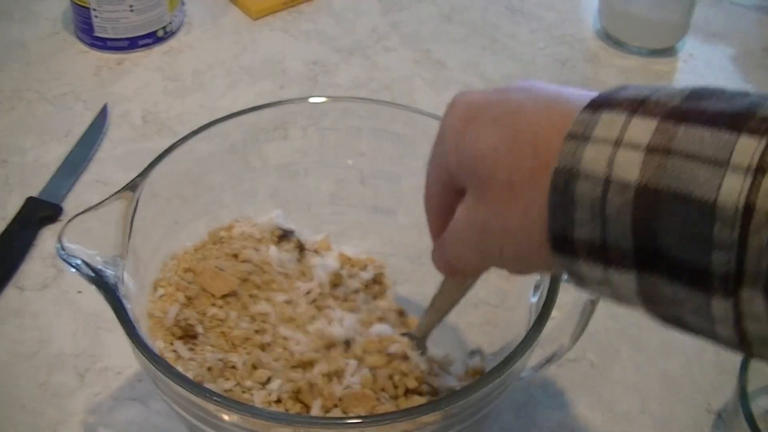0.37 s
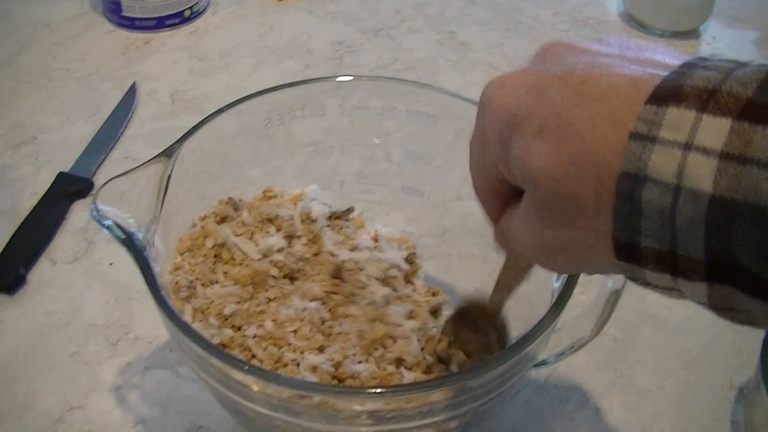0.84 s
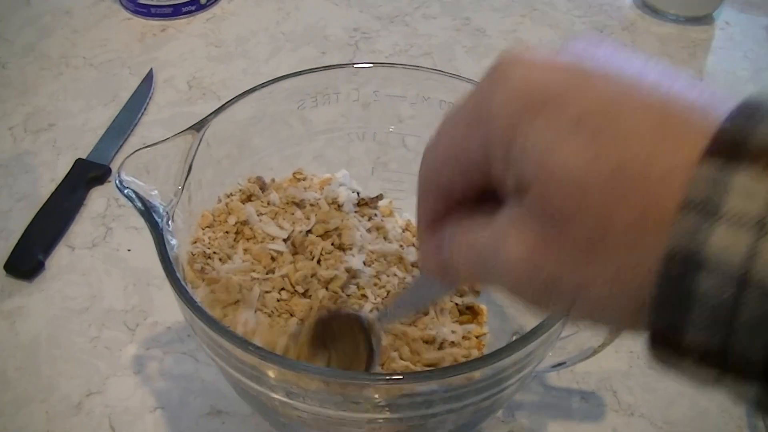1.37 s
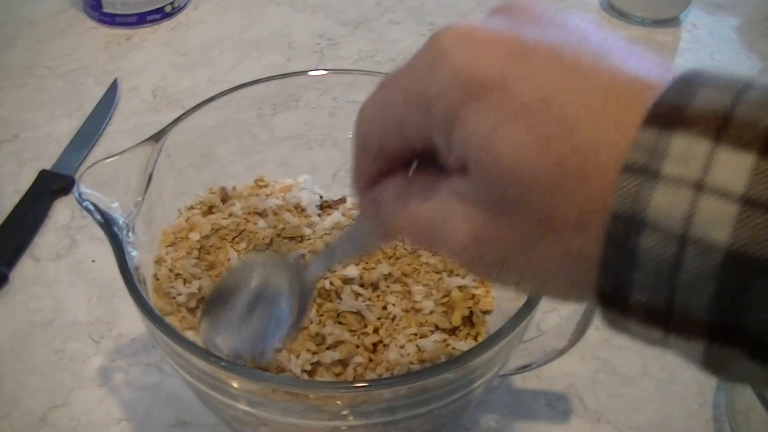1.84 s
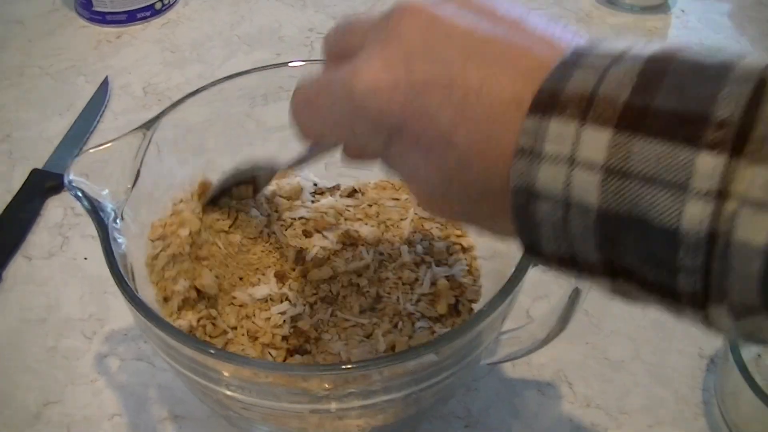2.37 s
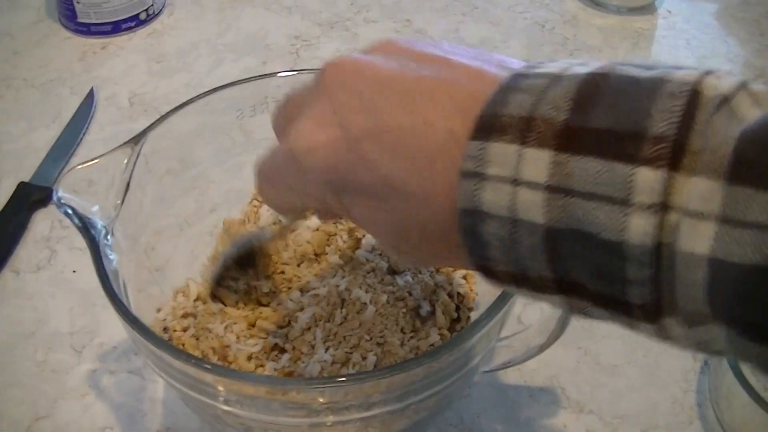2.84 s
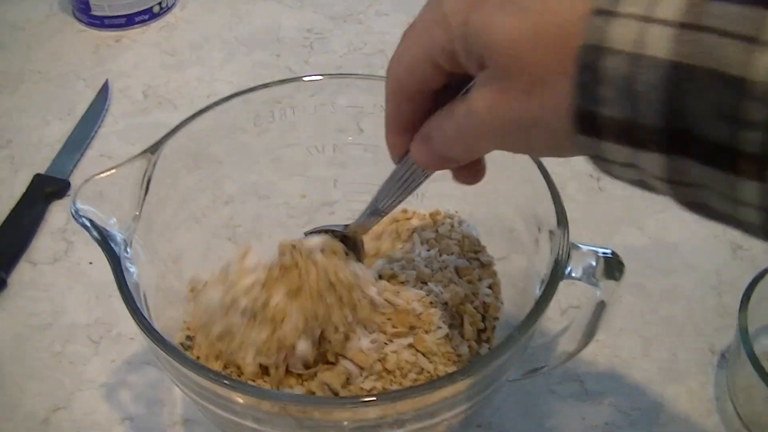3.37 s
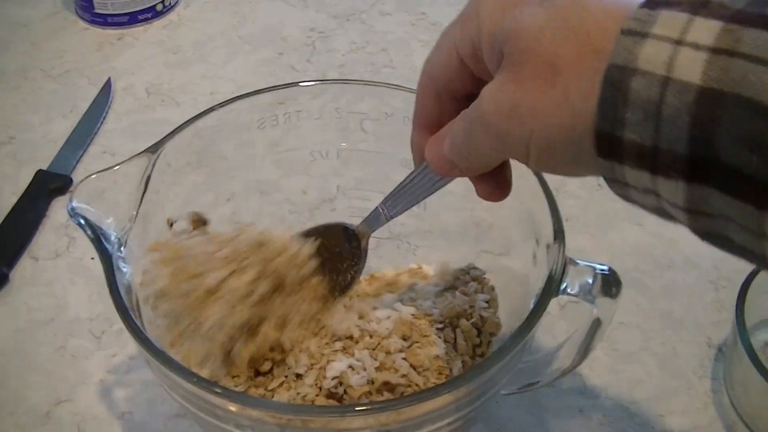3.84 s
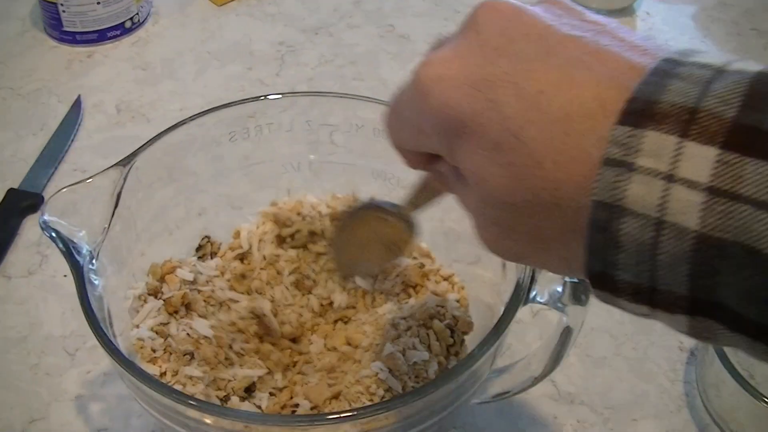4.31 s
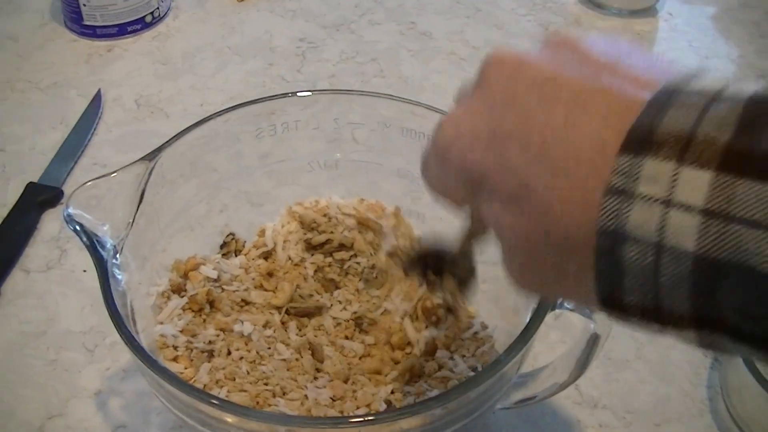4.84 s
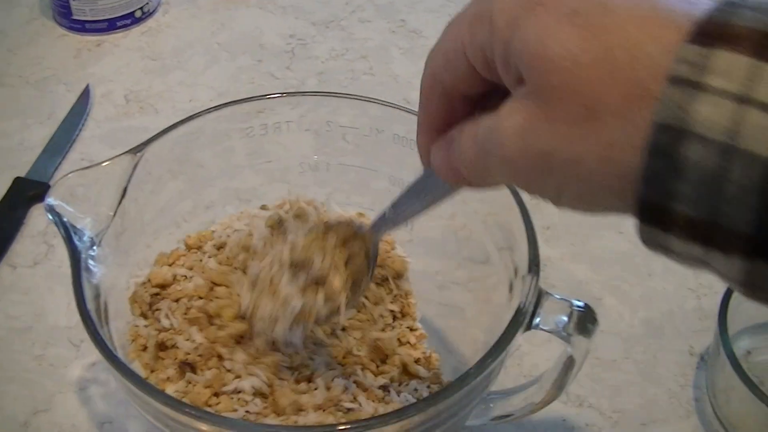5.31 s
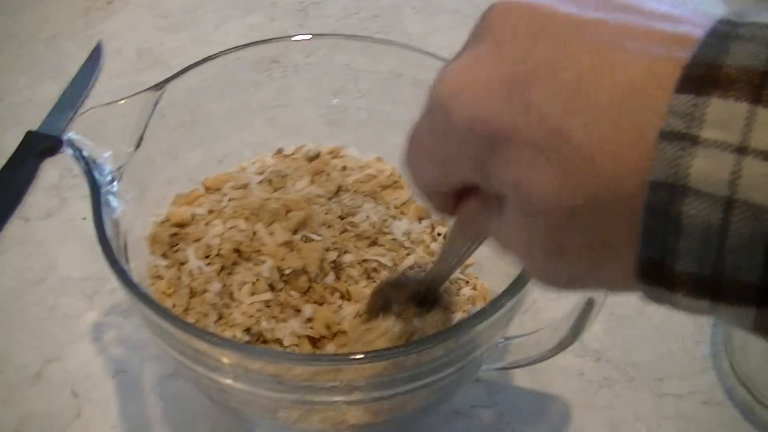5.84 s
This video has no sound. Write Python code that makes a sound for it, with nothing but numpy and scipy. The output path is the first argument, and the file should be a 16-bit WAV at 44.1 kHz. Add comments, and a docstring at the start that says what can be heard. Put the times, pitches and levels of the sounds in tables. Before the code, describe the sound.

A metal spoon briskly stirs a dry crumbly mixture in a thick glass bowl, with bright clinks, gritty rustling and knocks on the counter.

```python
"""Stirring crumbs in a glass bowl

A steel spoon stirs a dry crumbly mixture in a thick glass bowl on a kitchen counter: clicks ring glass and steel modes.
Random snaps and a coarse drag make the crumbs; the bowl rocks and its foot knocks short counter modes.
Dull thumps ring two low resonances of the house, under filtered-noise room air and a noise echo tail.
A small microphone with a limiter listens from close by."""
import sys
import numpy as np
from scipy import signal
from scipy.fft import rfft, irfft, next_fast_len
from scipy.io import wavfile

SR = 44100
rng = np.random.default_rng(int(sys.argv[2]) if len(sys.argv) > 2 else 0)


def ratio_of_db(decibels):
    """Turn decibels (scalar or array-like) into linear amplitude factors; 0 dB maps to 1."""
    return 10 ** (np.asarray(decibels, float) / 20)


def transcribe(signal):
    """Save signal, clipped to [-1, 1], as a 16-bit WAV file at the path in sys.argv[1]."""
    frames = np.atleast_2d(signal).T
    limited = np.clip(frames, -1, 1)
    pcm = np.round(limited * 32767).astype(np.int16)
    wavfile.write(sys.argv[1], SR, pcm)


N = 262593   # samples


def rms_one(x):
    """Scales a signal to rms 1."""
    return x / np.sqrt(np.mean(x ** 2) + 1e-20)


def at_hz(points, hz):
    """Reads a (Hz, dB) curve along a log-frequency axis."""
    curve_hz, curve_db = np.transpose(points)
    return np.interp(np.log(hz), np.log(curve_hz), curve_db)


def ring(clicks, hz, t60):
    """A damped resonance: a unit click sets a sine of height 1 ringing."""
    r, w = ratio_of_db(-60 / (t60 * SR)), 2 * np.pi * hz / SR
    return signal.lfilter([0, np.sin(w)], [1, -2 * r * np.cos(w), r * r], clicks + 1e-18)


def clicks_at(times, db):
    """One single-sample click for each time."""
    out = np.zeros(N)
    np.add.at(out, np.minimum((np.asarray(times) * SR).astype(int), N - 1), ratio_of_db(db))
    return out


def dying(times, db, t60):
    """A level that jumps at each time and dies away exponentially."""
    return signal.lfilter([1], [1, -ratio_of_db(-60 / (t60 * SR))], clicks_at(times, db) + 1e-18)


def coloured(x, spectrum):
    """Lays a spectrum on a noisy signal; rms 1."""
    size = next_fast_len(N)
    hz = np.maximum(np.arange(size // 2 + 1) * SR / size, 1)
    shaped = rfft(x, size) * ratio_of_db(at_hz(spectrum, hz))
    return rms_one(irfft(shaped, size)[..., :N])


def grains(per_s, spread_db):
    """Random clicks of either sign, most small and a few large; rms 1."""
    sizes = ratio_of_db(spread_db * np.minimum(rng.exponential(1, N), 5)) * rng.choice([-1, 1], N)
    return rms_one(sizes * (rng.random(N) < per_s / SR))


# tone of the room air: pitch_hz, relative density_db [dB per Hz]
AIR_TONE = [(18, -42), (30, -3.5), (294, 2), (566, -2.5), (1490, -6.5), (1660, -10), (2590, -8.5),
            (4730, -11), (7200, -10.5), (11200, -11), (15800, -23)]


def room_air():
    """Steady room tone: two independent noises, for middle and side."""
    return ratio_of_db(-50.5) * coloured(rng.standard_normal((2, N)), AIR_TONE)


# two low resonances of the house: pitch_hz, width_hz
HOUSE_MODES = [(69, 7.4), (131, 22)]
# steady rumble, one level_db for each house mode
STEADY_RUMBLE = (-86, -66)
# dull thumps in the house: start_s, low_mode_db, high_mode_db [peak]
THUMPS = [(0.03, -52, -34), (0.73, -48, -46), (0.959, -46, -44), (1.534, -40.5, -40), (1.83, -40, -40.5),
          (2.07, -45, -46), (2.262, -43.5, -46), (2.409, -46, -47), (5.021, -57, -56), (5.321, -62, -35),
          (5.772, -66, -49)]


def house_rumble():
    """Thumps and faint noise pass twice through each low house resonance, which softens their onset."""
    s, *thump_db = np.transpose(THUMPS)
    out = np.zeros(N)
    for (hz, width), db, steady_db in zip(HOUSE_MODES, thump_db, STEADY_RUMBLE):
        t60 = np.log(1000) / (np.pi * width)
        noise = rng.standard_normal(N + SR)
        steady = ring(ring(noise, hz, t60), hz, t60)[SR:]   # the first second is build-up
        out += ratio_of_db(steady_db) * rms_one(steady)
        thumps = ring(ring(clicks_at(s, db), hz, t60), hz, t60)
        out += thumps * 2 * np.e * np.pi * width / SR   # peak as in the table
    return out


# echo tail of the kitchen by band: pitch_hz, t60_s
KITCHEN = [(150, 0.45), (300, 0.32), (700, 0.41), (1800, 0.39), (4800, 0.28), (10000, 0.15)]


def kitchen_echo(x):
    """Echo tail: noise that dies band by band, one draw for the middle and one for the side."""
    t, tail = np.arange(SR // 2) / SR, 0
    for hz, t60 in KITCHEN:
        band = signal.butter(2, [hz / 1.5, hz * 1.5], "band", fs=SR, output="sos")
        noise = signal.sosfilt(band, rng.standard_normal((2, len(t))))
        tail = tail + noise * ratio_of_db(-60 * t / t60)
    tail = tail * np.clip(t / 0.0084, 0, 1) / np.sqrt(np.sum(tail ** 2) / 2)   # 8.4 ms fade-in
    return signal.fftconvolve(x[None], tail, axes=1)[:, :N]


# knocks on the counter, mostly by the bowl foot: start_s, relative level_db, dullness [dB per octave below 1
# kHz]
KNOCKS = [(0.008, -51.5, 18.5), (0.031, -41.5, 13), (0.057, -51, 16), (0.439, -13.5, -2),
          (0.729, -57, 19.5), (0.81, -48.5, 14), (0.998, -17, 4.5), (1.014, -22.5, -0.5), (1.282, -62, 18),
          (1.426, -18, 0), (1.726, -6.5, -0.5), (2.22, -9, 1.5), (2.524, 0.5, -2.5), (2.878, -21.5, -19),
          (2.943, 2, 0.5), (3.141, -22.5, 5), (3.26, -1, -2.5), (3.308, -5, -1), (3.338, -11.5, 1.5),
          (3.518, -22, -20), (3.674, -1.5, -3), (4.062, -32, 5.5), (4.288, -55, 12), (4.484, -18, -1.5),
          (4.884, -40, -15), (4.938, -17, 4.5), (4.945, -11, 2.5), (5.16, -40, 9.5), (5.332, -14, 2),
          (5.47, -17.5, 3.5), (5.765, -17, -8), (5.775, -3, -0.5), (5.931, -30, 5.5)]
# modes of the counter top: pitch_hz, relative level_db, t60_s
COUNTER_MODES = [(201.5, 6.5, 0.044), (237, 9, 0.016), (304.8, -4.5, 0.3), (421, 2, 0.035),
                 (467.3, -0.5, 0.072), (586, -2.5, 0.063), (712, -5, 0.024), (892, -2, 0.048),
                 (910.3, -6, 0.066), (1035, -2, 0.018), (1133, -3, 0.032), (1191, -2, 0.016),
                 (1495, 0.5, 0.013), (1710, 2.5, 0.0095), (2145, -7, 0.032), (2397, 0, 0.014),
                 (3280, -2.5, 0.01), (4100, -7, 0.011), (4900, -35, .004)]
# the foot bounces after each knock: delay_s, relative level_db
REBOUNDS = [(.0074, 0), (.0115, -5.5), (.015, -5), (.026, -10)]
# tone of a plain knock: pitch_hz, relative level_db
KNOCK_TONE = [(220, -25.5), (500, -9), (1000, -0.5), (2500, -15.5)]


def counter_knocks():
    """Each knock and its rebounds ring the short, dull modes of the counter top."""
    s, knock_db, dull_db = np.transpose(KNOCKS)
    out = np.zeros(N)
    chance = rng.standard_normal((len(s), len(COUNTER_MODES), len(REBOUNDS) + 1))
    for k, (hz, db, t60) in enumerate(COUNTER_MODES):
        tone_db = knock_db + at_hz(KNOCK_TONE, hz) + dull_db * np.log2(1000 / min(hz, 1000))
        tone_db += 0.21 * knock_db * np.log2(max(hz, 1000) / 1000)   # harder knocks are brighter
        blows = clicks_at(s, tone_db + 2.5 * chance[:, k, 0])
        for j, (lag, rebound_db) in enumerate(REBOUNDS):
            blows += clicks_at(s + lag, tone_db + rebound_db + 3 * chance[:, k, j + 1])
        out += ratio_of_db(db) * ring(blows, hz, t60) * (-1) ** k
    too_small_for_bass = signal.butter(3, 140, "high", fs=SR, output="sos")
    return signal.sosfilt(too_small_for_bass, out)


# spoon on glass: start_s, relative spoon_db, relative glass_db, hardness [dB per octave],
# place round the bowl [dB], place up the wall [dB]
CLINKS = [(0.0882, -35, -52, 12, -1, -1), (0.2322, 0, -7.5, 6.5, 1.5, 12), (0.5356, -49, -46.5, 1, -9, 6),
          (0.616, -42, -42.5, 2, -9, 7), (0.8155, -21, -47.5, 13.5, -7, 2), (0.863, -14.5, -53, 18, 2, -3),
          (1.397, -31, -48.5, 20.5, -1, 1), (1.4256, -16, -43, 1, 12, -2), (1.6235, -35, -44, 12, -5, -9),
          (1.9247, 1.5, -22.5, -2, -15.5, 23), (1.941, -49, -41.5, -10.5, 2.5, -13),
          (2.373, -17, -48, 3.5, 0, -10), (2.4241, -27, -44.5, 10, 5, 5), (2.436, -52, -47, -0.5, 8.5, -8),
          (2.6833, -39, -42, 1.5, -2.5, -2), (2.833, -24.5, -47.5, -1, 9.5, 10),
          (3.1408, -4.5, -29.5, -1.5, 14, 6), (3.516, -2.5, -52, -4.5, 20.5, 9),
          (3.5911, 1, -9.5, 7, -10, -2), (3.8348, -45, -39, 1.5, -8, -5), (3.867, -11.5, -31.5, 1, 1, 8),
          (4.0559, -34, -34.5, 4, 1, 6.5), (4.2394, -19, -35, 8, 1.5, 1.5), (4.3837, -19, -64, 19, 16, -7),
          (4.445, -15, -37, 4, -2, 6), (4.455, -2.5, -27, -5.5, 1, -3), (4.665, -25, -41, 3.5, -6, 3),
          (4.826, -24, -57, 18, -7, 8), (4.853, -21, -53.5, 23, 1, 2), (4.8832, -11.5, -47, 0, 2, 30.5),
          (5.105, -22, -48, 3, -3, 9), (5.2792, -39, -50, 14, 6, 7), (5.461, -30, -32, 0.5, 0, 4),
          (5.469, -18, -50.5, 8, 26, 4), (5.5774, -14, -53.5, -2.5, 9, 11), (5.6883, -23.5, -57, 14, -6, 3),
          (5.894, -16, -39, 7, -6, 2)]
# strokes through the crumbs: start_s, length_s, relative start_db, relative end_db,
# ringing_db [share that rings the glass, held until the next stroke]
STROKES = [(0.0, 0.16, -30.5, -46, -2), (0.3, 0.47, -34, -42, 3.5), (0.775, 0.033, -33, -56, 8.5),
           (0.87, 0.21, -34, -35.5, -4), (1.112, 0.2, -44, -40.5, -14), (1.403, 0.28, -30, -32.5, -2.5),
           (1.97, 0.13, -52, -32, -16), (2.378, 0.26, -35, -36.5, -16), (2.815, 0.11, -38.5, -31, 8),
           (3.165, 0.27, -27.5, -40.5, 8), (3.519, 0.24, -31, -26, 2), (4.001, 0.19, -33.5, -31.5, -2),
           (4.399, 0.21, -33, -34.5, -25), (4.832, 0.071, -52, -22.5, -5), (4.99, 0.33, -37, -44, -14),
           (5.264, 0.077, -49, -38, 10.5), (5.446, 0.29, -31.5, -39, -20), (5.756, 0.28, -32, -26, -4)]


def stirring():
    """Crumb, drag and ringing levels in dB; each touch of the spoon starts a short skid through the crumbs."""
    t, strokes, ringing_db = np.arange(N) / SR, 1e-5, np.zeros(N)
    dig_s, settle_db_per_s = 0.012, 179   # the spoon digs in at once, crumbs settle after
    for s, length, start_db, end_db, share_db in STROKES:
        db = np.interp(t, [s, s + length], [start_db, end_db])
        db = db - settle_db_per_s * np.maximum(t - s - length, 0)
        strokes = strokes + ratio_of_db(db) * np.clip((t - s) / dig_s, 0, 1)
        ringing_db[t >= s] = share_db
    s, spoon_db = np.transpose(CLINKS)[:2]
    skid = dying(s, np.minimum(spoon_db, -8.0) - 19, t60=0.25)
    s, knock_db = np.transpose(KNOCKS)[:2]
    shudder = dying(s, knock_db - 22, t60=0.48)   # the bowl drags on a little after a knock
    drag = ratio_of_db(-9.5) * strokes + shudder
    return 20 * np.log10(strokes + skid), 20 * np.log10(drag), ringing_db


# tone of the snapping crumbs: pitch_hz, relative density_db [dB per Hz]
CRUMB_TONE = [(590, -33), (1000, -24), (2350, -8), (3820, -5), (5040, -3.5), (6570, -7), (6970, -13.5),
              (9300, -6.5), (15800, -21.5)]
# tone laid on the drag clicks: pitch_hz, relative level_db
DRAG_TONE = [(70, -34), (130, -13), (250, -2.5), (450, -2.5), (1000, 3), (1800, -3), (3000, -30)]


def crumbs(crumbs_db, drag_db):
    """Crumbs snap in clumps, each snap at one of 12 pitches; the drag over the bottom is coarser and lower."""
    r = np.exp(-2 * np.pi * 12.4 / SR)
    slow_noise = signal.lfilter([1], [1, -2 * r, r * r], rng.standard_normal(N + SR))[SR:]
    clumps = ratio_of_db(3.66 * rms_one(slow_noise))
    snaps, dealt = grains(per_s=9000, spread_db=3.5), rng.integers(0, 12, N)
    lean = ratio_of_db(0.4 * np.array([[1], [-1]]))   # crumbs lie left and right of the spoon
    rustle = 0
    for k, hz in enumerate(np.geomspace(1200, 15000, 12)):
        pitched = rms_one(ring(snaps * (dealt == k), hz, 12 / hz))
        rustle = rustle + pitched * np.sqrt(hz) * lean ** (-1) ** k
    snapping = rms_one(clumps * coloured(rustle, CRUMB_TONE))
    drag = coloured(grains(per_s=1000, spread_db=5.5), DRAG_TONE)
    return ratio_of_db(crumbs_db - 7.5) * snapping + ratio_of_db(drag_db - 7.5) * drag


def contact_crack():
    """The bare contact: a tick of a few ms, then the many weak modes of the thick wall as a dying hiss."""
    s, spoon_db = np.transpose(CLINKS)[:2]
    t = np.arange(SR // 4) / SR
    fade = np.exp(-t / 0.0054) + ratio_of_db(-47.0) * np.exp(-t / 0.016)
    tick = rng.standard_normal(len(t)) * fade
    # both grow faster than the blow, so light touches only ring
    crack = signal.fftconvolve(clicks_at(s, 1.74 * spoon_db - 3.5), tick)[:N]
    return signal.sosfilt(signal.butter(2, [1200, 9000], "band", fs=SR, output="sos"), crack)


# spoon modes, damped by the hand: pitch_hz, relative level_db, t60_s [held to 0.06 at most]
SPOON_MODES = [(4250, -7, 0.055), (5074, -0.5, 0.031), (6110, -34.5, 0.11), (6450, -5, 0.051),
               (8660, -27, 0.099), (9200, -50, .03), (10300, -30, 0.018), (10980, -9, 0.05),
               (14000, -24, 0.022), (16000, -15, 0.021)]


def steel_spoon(crumbs_db):
    """Clinks and rubbing crumbs ring the short steel modes, each a little to one side."""
    s, spoon_db = np.transpose(CLINKS)[:2]
    out, chance = np.zeros((2, N)), rng.standard_normal((len(s), len(SPOON_MODES)))
    rub = grains(per_s=280, spread_db=5.5) * ratio_of_db(crumbs_db - 33)
    for k, (hz, db, t60) in enumerate(SPOON_MODES):
        blows = clicks_at(s, spoon_db - 14 + 3 * chance[:, k])
        lean = ratio_of_db(1.13 * (-1) ** k * np.array([[1], [-1]]))
        out += lean * ratio_of_db(db) * ring(blows + np.roll(rub, 31 * k), hz, min(t60, .06))
    return out


# glass modes, some in close twins: pitch_hz
GLASS_PITCHES = [585, 641, 1475, 1535, 2630, 2680, 3634, 4190, 4315, 4700, 5748, 5880, 6164, 6246, 6590,
                 6756, 7388, 7575, 7805, 7910, 8664, 9582, 9760, 12090, 12500, 14700]
# one row a glass mode: relative level_db, t60_s, response to place round, response to place up [both held to -1..1]
GLASS_MODES = [(-15, 0.23, 0.56, 0.31), (-20, 0.37, 1, 0.46), (-13, 0.52, 0.78, 0.61),
               (2, 0.38, -0.37, -0.36), (-5, 0.3, 1, -1.1), (0.7, 0.27, -0.18, -0.075),
               (-6, 0.19, .99, 0.035), (-9.5, 0.091, -1.3, 0.39), (-40, .067, .99, .99),
               (-4, 0.2, -0.58, 0.5), (-22, 0.36, -0.042, -0.22), (-20, 0.18, -.99, -1.3),
               (2.9, 0.049, -0.46, -0.27), (-17, 0.66, 0.39, -.99), (-10, 0.19, -.25, -1.5),
               (-14, 0.16, 0.15, .99), (-38, .22, -.15, -.99), (-11, 0.063, 0.67, 0.67),
               (-8.5, 0.2, -0.19, -0.86), (-22, 0.62, 0.74, -1.1), (-4.5, 0.11, 0.26, -0.18),
               (-10, 0.28, 0.47, -0.58), (-58, 0.2, 0.58, -.46), (-15, 0.16, -0.14, -.76),
               (-22, 0.09, 0.17, 0.31), (-19, 0.07, -0.19, 0.68)]


def glass_bowl(crumbs_db, ringing_db):
    """Clinks and scraping crumbs drive the glass modes; each radiates a little to one side."""
    s, _, glass_db, hardness_db, round_db, height_db = np.transpose(CLINKS)
    out, chance = np.zeros((2, N)), rng.standard_normal((len(s), len(GLASS_MODES)))
    scrape, press = grains(per_s=400, spread_db=3), ratio_of_db(crumbs_db + ringing_db - 49)
    shifts = rng.integers(0, N, len(GLASS_MODES))   # each mode is woken by other crumbs
    for k, (hz, (db, t60, by_round, by_height)) in enumerate(zip(GLASS_PITCHES, GLASS_MODES)):
        # a blow near a node hardly wakes the mode
        place_db = round_db * np.clip(by_round, -1, 1) + height_db * np.clip(by_height, -1, 1)
        bright_db = hardness_db * np.log2(np.clip(hz, 1400, 8000) / 4000)
        blows = clicks_at(s, glass_db + bright_db + place_db + 1.2 * chance[:, k])
        lean = ratio_of_db(0.89 * (-1) ** k * np.array([[1], [-1]]))
        out += lean * ratio_of_db(db) * ring(blows + press * np.roll(scrape, shifts[k]), hz, t60)
    return out


def scene():
    """Close sources lean a little left; room and air add a weak side part."""
    crumbs_db, drag_db, ringing_db = stirring()
    bowl = glass_bowl(crumbs_db, ringing_db) + steel_spoon(crumbs_db) + contact_crack()
    bowl = bowl + crumbs(crumbs_db, drag_db)
    foot = counter_knocks()
    wet = kitchen_echo(ratio_of_db(-8.5) * bowl.mean(axis=0) + ratio_of_db(-9) * foot)
    air = room_air()
    mid = wet[0] + air[0]
    side = ratio_of_db(-21.5) * wet[1] + ratio_of_db(-23) * foot
    # long waves reach both ports alike
    side = signal.sosfilt(signal.butter(3, 420, "high", fs=SR, output="sos"), side)
    side = side + ratio_of_db(-10) * signal.sosfilt(signal.butter(1, 3000, fs=SR, output="sos"), air[1])
    direct = bowl * ratio_of_db([[.25], [-.25]]) + (foot + house_rumble()) * ratio_of_db([[.3], [-.3]])
    return direct + mid + side * np.array([[1], [-1]])


def roll_off(x):
    """The treble ends steeply here."""
    return signal.sosfilt(signal.butter(12, 15970, fs=SR, output="sos"), x)


def record(dry):
    """A limiter ducks loud blows within a few ms and lets go at a steady rate; what it misses is clipped."""
    limit_db, release_db_per_s, attack_s = -3, 292, 0.0033
    over_db = np.maximum(20 * np.log10(np.abs(dry).max(axis=0) + 1e-9) - limit_db, 0)
    fall = release_db_per_s * np.arange(N) / SR
    held_db = np.maximum.accumulate(over_db + fall) - fall
    r = np.exp(-1 / (attack_s * SR))
    ducked = dry * ratio_of_db(-.95 * signal.lfilter([1 - r], [1, -r], held_db))
    low_cut = signal.butter(2, 45, "high", fs=SR, output="sos")
    heard = signal.sosfilt(low_cut, np.clip(ducked, -1, 1))
    return roll_off(heard)


dry = scene()
out = record(dry)
transcribe(out)
```